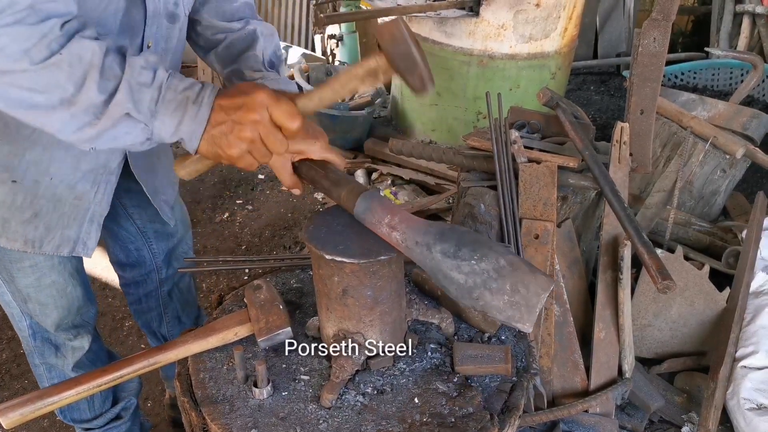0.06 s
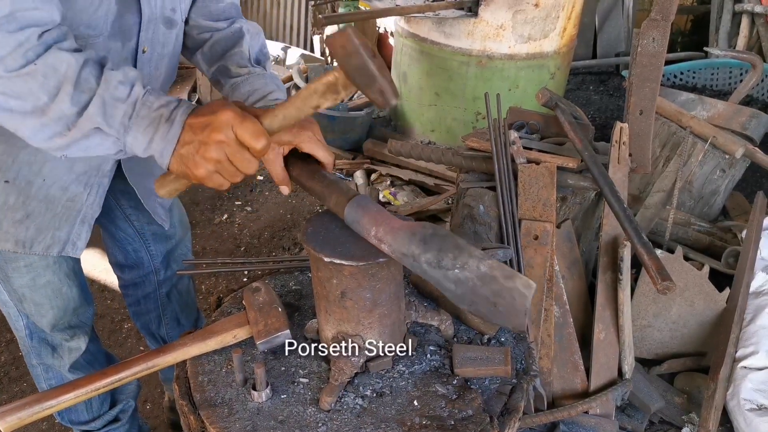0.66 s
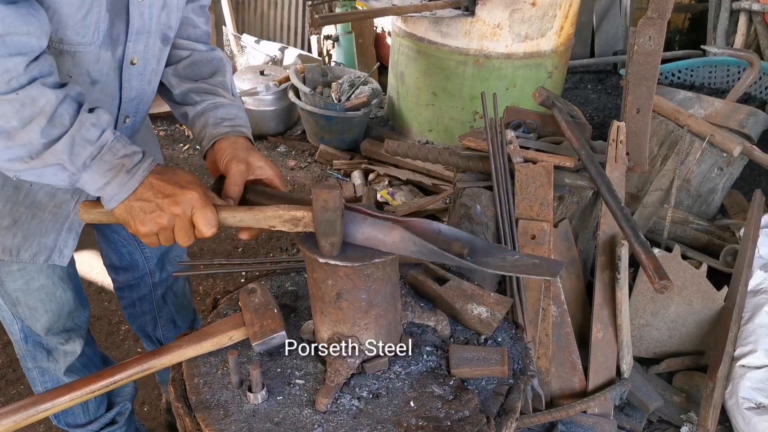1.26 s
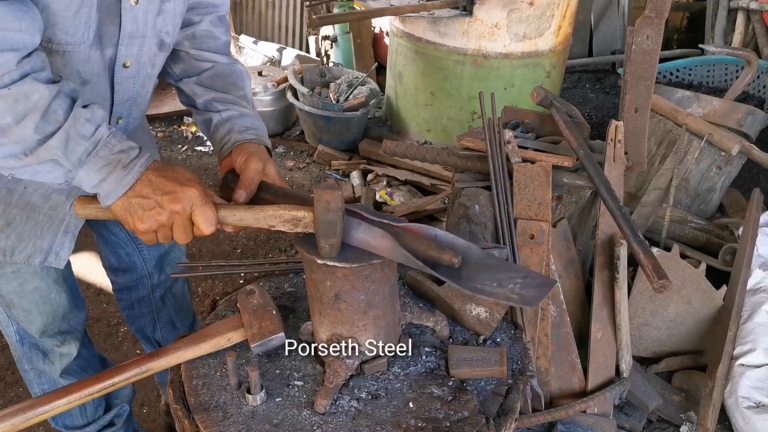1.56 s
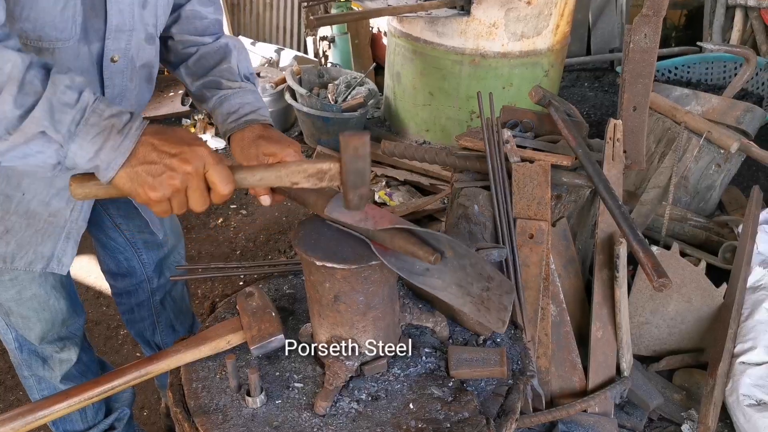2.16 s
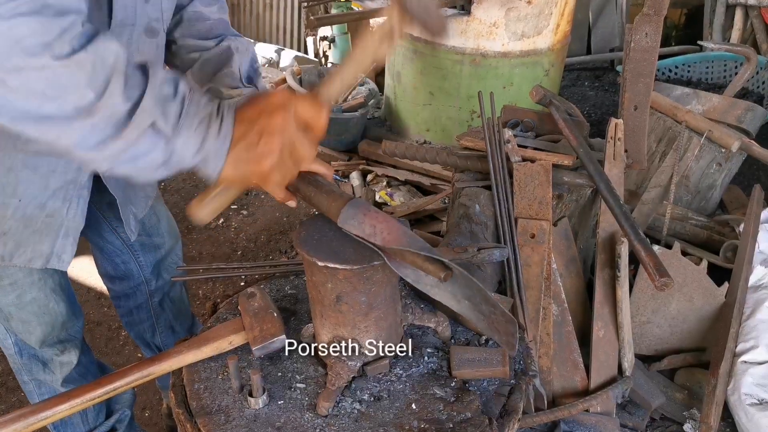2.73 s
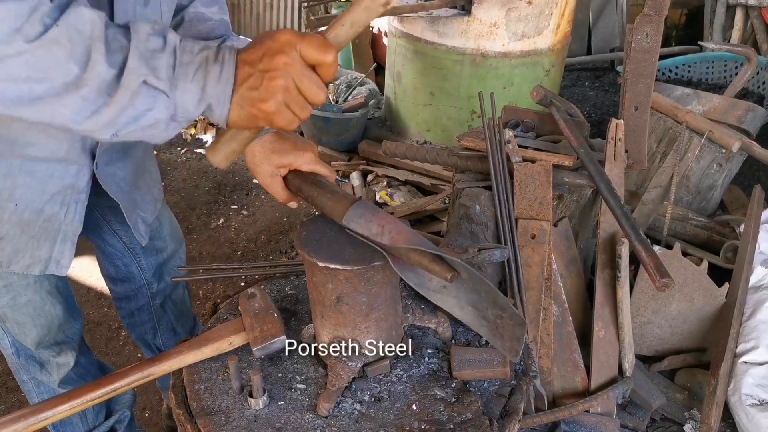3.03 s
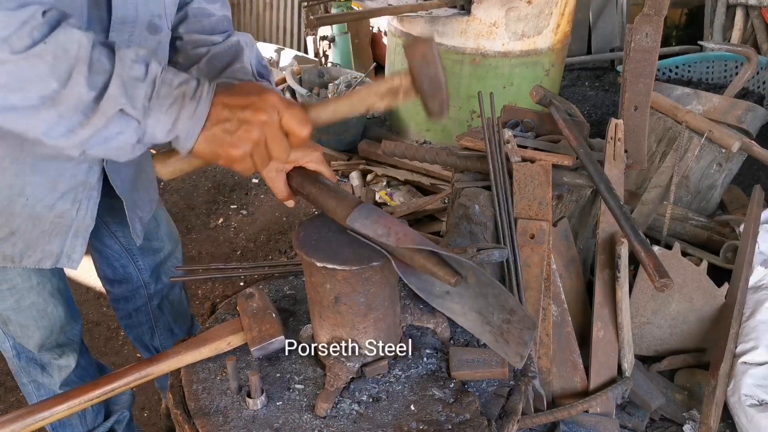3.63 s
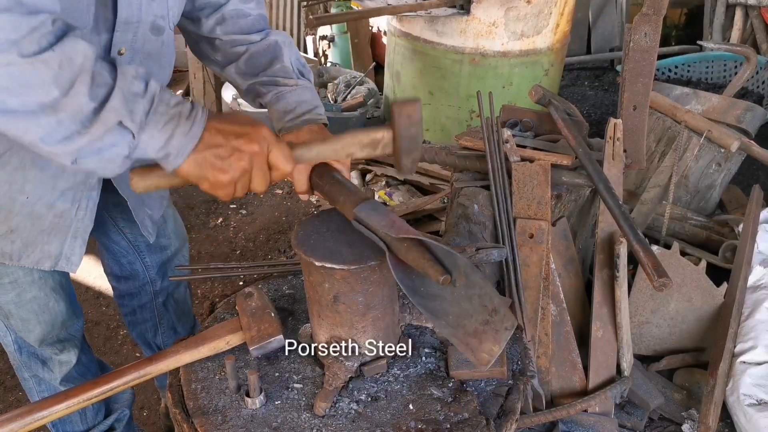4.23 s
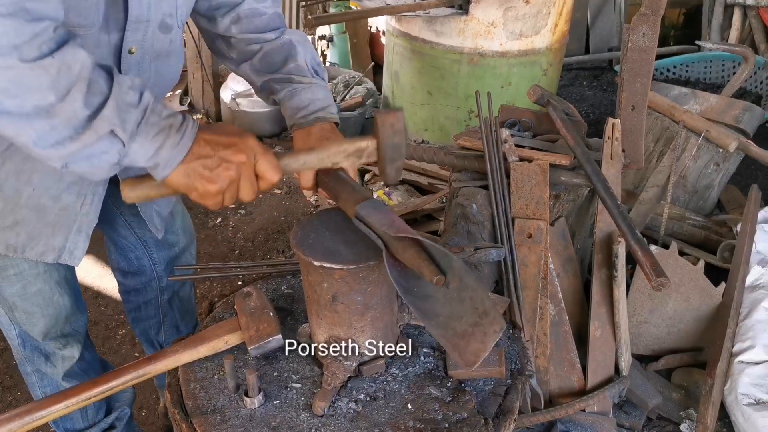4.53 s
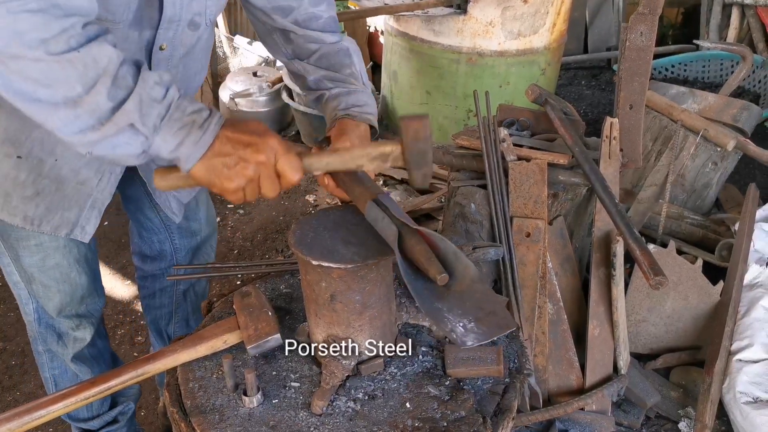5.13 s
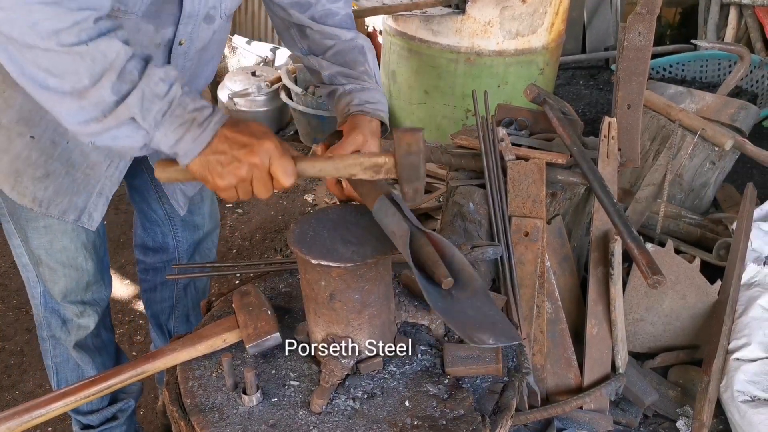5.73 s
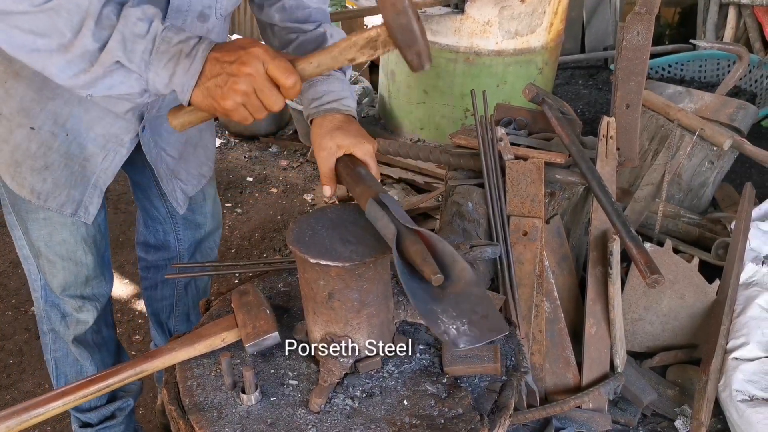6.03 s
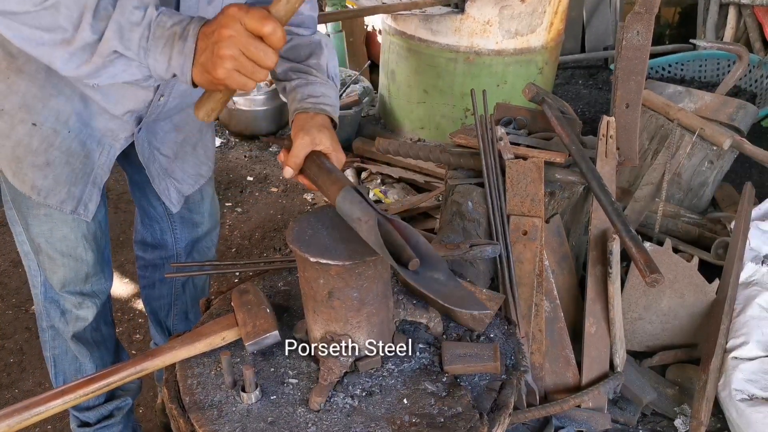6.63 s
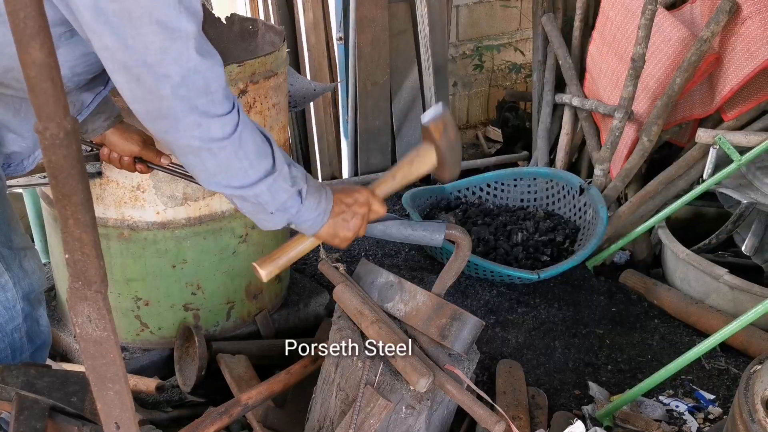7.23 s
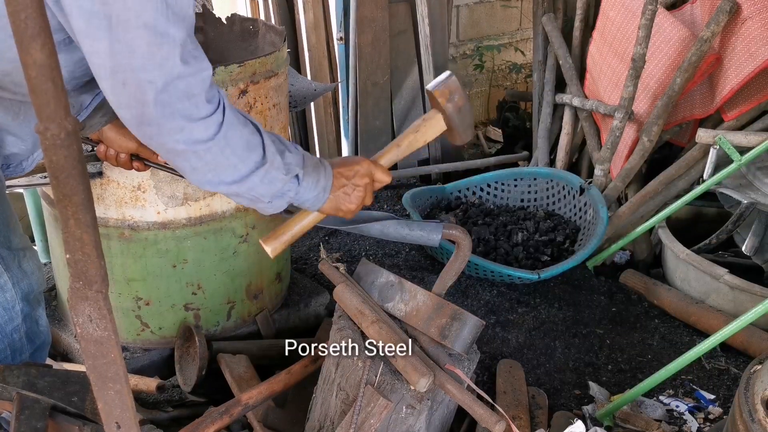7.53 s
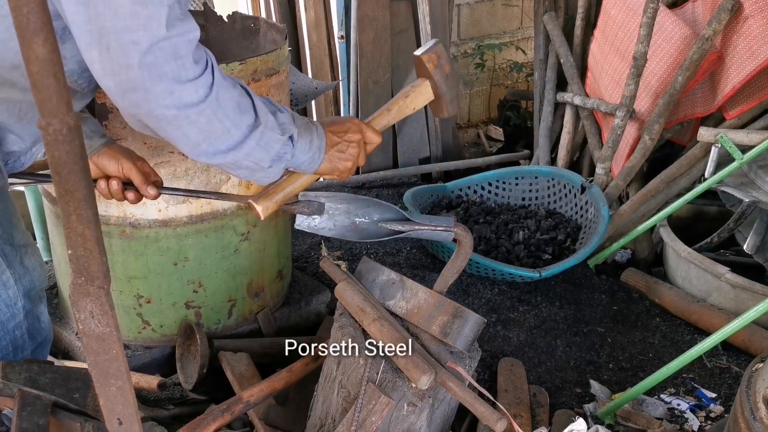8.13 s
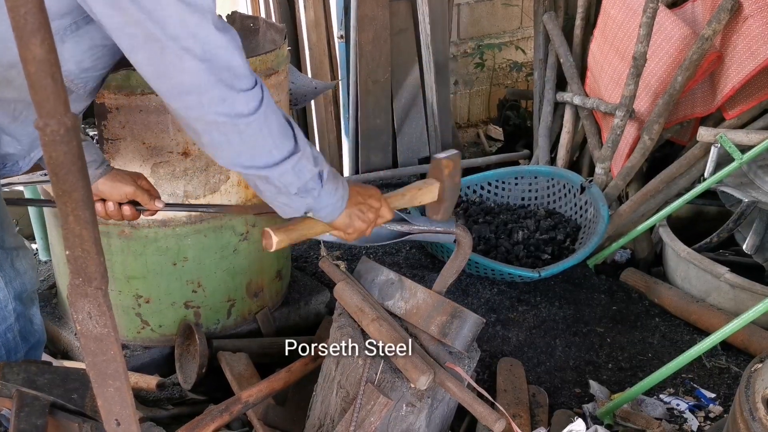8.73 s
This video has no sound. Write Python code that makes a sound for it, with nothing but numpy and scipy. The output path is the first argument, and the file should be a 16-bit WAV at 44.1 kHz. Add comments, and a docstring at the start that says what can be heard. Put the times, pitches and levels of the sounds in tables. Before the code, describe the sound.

Hammer blows clang on a steel blade in a workshop, in runs broken by brief pauses, small knocks and sliding metal.

```python
"""Hammering a blade on an anvil

A smith strikes a hand-held steel blade in an open workshop, sliding and knocking it between runs.
Each blow is a crack, a short clang of the blade, a thin ring of the anvil and a thud of its block.
A limiter ducks the room's rumble and hiss. After a brief fade to silence the work goes on over
an iron stake, with an engine chugging far off."""
import sys
import numpy as np
from scipy import signal
from scipy.fft import rfft, irfft, next_fast_len
from scipy.io import wavfile
from scipy.ndimage import uniform_filter1d

SR = 44100
rng = np.random.default_rng(int(sys.argv[2]) if len(sys.argv) > 2 else 0)


def wav_record(signal):
    """Record a signal, one row per channel, as 16-bit PCM in the file named by sys.argv[1]."""
    frames = np.transpose(np.atleast_2d(signal))
    bounded = np.clip(frames, -1, 1)
    # unit amplitude maps onto the largest positive 16-bit level
    quanta = np.round(bounded * 32767).astype(np.int16)
    wavfile.write(sys.argv[1], SR, quanta)


N = 386757
TIME = np.arange(N) / SR
STAKE_FROM_S = 7.254  # anvil before, stake after


def gain_of(db):
    """Decibels to amplitude."""
    return 10 ** (np.asarray(db) / 20)


def unit_rms(x):
    """Scales to rms 1."""
    return x / np.sqrt(np.mean(x ** 2) + 1e-20)


def curve_at(points, hz):
    """Interpolates on a log-frequency axis."""
    point_hz, value = np.transpose(points)
    return np.interp(np.log(hz + 1), np.log(point_hz), value)


def add(mix, start_s, sound):
    """Mixes in a stereo sound."""
    part = mix[:, max(round(start_s * SR), 0):][:, :sound.shape[1]]
    part += sound[:, :part.shape[1]]


def wander(n, size):
    """Smooth random curve, rms 1, changing over about size steps."""
    return unit_rms(uniform_filter1d(uniform_filter1d(rng.standard_normal(n), size), size))


# left-right coherence: (frequency [Hz], coherence [0-1])
COHERENCE = [(50, 1), (400, 0.91), (1000, 0.14), (2500, 0.045), (6000, 0.028), (15000, 0.05)]


def noise(spectrum, n, colour_db=0, ripple_db=0):
    """Shaped stereo noise with random peaks and dips, rms 1 before colouring; near-mono bass."""
    hz = np.fft.rfftfreq(n, 1 / SR)
    left, other = rfft(rng.standard_normal((2, n)))
    coherence = curve_at(COHERENCE, hz)
    right = coherence * left + np.sqrt(1 - coherence ** 2) * other
    shape_db = curve_at(spectrum, hz) + ripple_db * np.minimum(wander(len(hz), size=36), 2)
    bins = np.array([left, right]) * gain_of(shape_db)
    return irfft(bins * gain_of(colour_db), n) / np.std(irfft(bins, n))


def ring(hz, db, t60_s, t):
    """Decaying sines; higher modes differ more in phase between the microphones."""
    phase, spread = rng.uniform(-np.pi, np.pi, (2, len(hz)))
    phasors = np.exp(1j * np.array([phase, phase + spread * np.minimum(hz / 5000, 1)]))
    waves = np.exp(np.outer(2j * np.pi * hz - np.log(1000) / t60_s, t))
    return np.einsum("cm,mt->ct", phasors * gain_of(db), waves).real


def pan(x, right_db):
    """Sets the right channel's level relative to the left."""
    return x * gain_of(np.array([[-.5], [.5]]) * right_db)


def from_left(x, lag_s=0.00034):
    """Low sound from outside reaches the right microphone later and weaker."""
    delayed = np.interp(TIME - lag_s, TIME, x[1])
    return pan(np.array([x[0], delayed]), right_db=-2)


# room noise spectra: (frequency [Hz], relative density [dB])
RUMBLE_SPECTRUM = [(20, -14.5), (50, 5.5), (100, 6.5), (140, 0.5), (200, -9.5), (300, -20.5), (600, -35.5),
                   (1500, -73.5)]
HISS_SPECTRUM = [(100, 12.5), (400, 1.5), (800, 1.5), (1400, -1.5), (2300, 4), (3200, -6.5), (5000, -12.5),
                 (9000, -17), (13000, -22.5), (16000, -23.5)]
# room levels: (time [s], rumble [dB], hiss [dB])
ROOM_LEVELS = [(0, -63.5, -59.5), (1.501, -53, -57.5), (6.7, -53, -60), (7.4, -53, -56.5), (8.77, -57, -58)]


def workshop():
    """Slightly lumpy low rumble under a soft hiss."""
    times_s, *levels_db = np.transpose(ROOM_LEVELS)
    rumble_db, hiss_db = (np.interp(TIME, times_s, db) for db in levels_db)
    lumps_db = 0.56 * wander(N, size=2500)
    n_fft = next_fast_len(N, True)
    rumble = noise(RUMBLE_SPECTRUM, n_fft)[:, :N] * gain_of(rumble_db + lumps_db)
    hiss = noise(HISS_SPECTRUM, n_fft)[:, :N] * gain_of(hiss_db)
    return from_left(rumble) + hiss


# exhaust resonances: (frequency [Hz], relative level [dB], t60 [s])
EXHAUST_MODES = [(123.3, 2.5, 0.093), (193, -8.5, 0.1), (269, -6.5, 0.084), (359.7, -15, 0.16)]


def engine(firing_hz=21.53, scatter_db=2.2, level_db=-51.5, attack_s=0.0088):
    """Each firing of a distant engine rings its exhaust; heard only beside the stake."""
    cycles = np.cumsum(firing_hz * (1 + .004 * wander(N, size=6000))) / SR
    firings = np.diff(np.floor(cycles), prepend=0) * gain_of(scatter_db * rng.standard_normal(N))
    t = np.arange(SR // 4) / SR
    puff = sum(gain_of(db - 60 * t / t60_s) * np.sin(2 * np.pi * hz * t)
               for hz, db, t60_s in EXHAUST_MODES)
    puff *= 1 - np.exp(-t / attack_s)
    chug = unit_rms(signal.oaconvolve(firings, puff)[:N]) * gain_of(level_db) * (TIME > STAKE_FROM_S)
    return from_left([chug, chug])


# steel friction: (frequency [Hz], relative density [dB])
RUB_SPECTRUM = [(200, -30), (1000, -20), (2500, -14.5), (4500, -6.5), (8000, -7.5), (11000, -1),
                (14000, -3), (16000, 2)]
# strokes: (peak time [s], 20 dB rise [s], 20 dB fall [s], relative level [dB])
SLIDE_STROKES = [ (1.345, 0.043, .1, -51.5), (1.439, .05, .15, -54.5), (1.68, 0.13, 0.063, -47.5),
                 (2.079, 0.022, 0.19, -47), (2.316, 0.11, 0.072, -39), (2.394, 0.075, 0.067, -41),
                 (6.001, 0.074, 0.16, -54), (7.87, 0.13, 0.1, -32.5), ]


def sliding(trim_db=-7, grain=0.27, resonance_db=12, half_width_hz=29):
    """The blade rubs over its support: gritty swells of hiss that sing faintly at its modes."""
    out = np.zeros((2, N))
    t = np.arange(SR) / SR - .5
    offset_hz = np.fft.rfftfreq(SR, 1 / SR)[:, None] - np.transpose(BLADE_MODES)[0]
    colour_db = resonance_db * (1 / (1 + (offset_hz / half_width_hz) ** 2)).max(1)
    for peak_s, rise_s, fall_s, db in SLIDE_STROKES:
        grit = unit_rms(np.exp(grain * wander(SR, size=90)))
        rub = unit_rms(noise(RUB_SPECTRUM, SR, colour_db, ripple_db=4.2)) * grit
        envelope_db = -20 * np.maximum(-t / rise_s, t / fall_s)
        add(out, peak_s + t[0], rub * gain_of(trim_db + db + envelope_db))
    return out


# wooden block: (frequency [Hz], level [dB], t60 [s])
BLOCK_MODES = [(125, -27.5, 0.033), (193, -21.5, 0.025), (392, -17.5, 0.011)]


def block_thud(t):
    """The wood under the iron thuds: low, heavily damped modes."""
    return ring(*np.transpose(BLOCK_MODES), t)


# iron supports: (frequency [Hz], level [dB], free t60 [s])
ANVIL_MODES = [(3271, -12, .32)]
STAKE_MODES = [(6099, -32, .55), (8240, -31, .4), (10290, -38, .34)]


def support_ring(t, start_s, level_db, damping_per_s=3.1):
    """Anvil or stake rings; a blade pressed flat on it both weakens and shortens the ring."""
    modes = ANVIL_MODES if start_s < STAKE_FROM_S else STAKE_MODES
    damping_db = damping_per_s * min(level_db, 0) * t
    return ring(*np.transpose(modes), t) * gain_of(level_db + damping_db)


def tone_db(hz, bass_db, treble_db):
    """Shelves: a soft seat adds bass, a hard square contact adds treble."""
    return bass_db / (1 + (hz / 1300) ** 3) + treble_db / (1 + (5000 / (hz + 1)) ** 3)


# clang spectrum: (frequency [Hz], relative density [dB])
CLANG_SPECTRUM = [(60, -23.5), (250, -17.5), (550, -14), (850, -4.5), (1450, -10.5), (2100, 1), (3000, -4),
                  (4300, -2.5), (8000, -7), (11000, -8), (13500, -11), (16000, -22)]
# clang decay: (frequency [Hz], t60 [s])
CLANG_DECAY = [(150, 0.22), (800, 0.17), (2300, 0.2), (5000, 0.17), (14000, 0.16)]


def clang(t, bass_db, treble_db, trim_db=-5):
    """Dense weak steel modes and workshop reflections, as noise decaying band by band."""
    colour_db = tone_db(np.fft.rfftfreq(len(t), 1 / SR), bass_db, treble_db)
    wash = noise(CLANG_SPECTRUM, len(t), colour_db, ripple_db=4.2)
    hz, age_s, bands = signal.stft(wash, SR, nperseg=256)
    decay_db = -60 * age_s / curve_at(CLANG_DECAY, hz)[:, None]
    return signal.istft(bands * gain_of(trim_db + decay_db), SR)[1][:, :len(t)]


# blade modes: (frequency [Hz], relative level [dB], t60 [s], antinode position [0-1])
BLADE_MODES = [ (765, 0, .12, .76), (803, -2, .17, .8), (975, -1, .15, .49), (1228, -1, .17, .55),
               (1310, -5, .17, .97), (1703, 2, .17, .05), (1862, 2, .18, .52), (2300, 1, .19, .86),
               (2560, 7, .08, .28), (2750, 9, .12, .28), (2965, 1, .21, .42), (3240, 3, .18, .1),
               (3692, 2, .19, .62), (3920, 4, .18, .2), (4150, 8, .05, .28), (4252, 0, .2, .82),
               (4572, 0, .19, .79), (4810, 3, .18, .53), (5420, 7, .08, .08), (5550, 2, .16, .57),
               (5860, 1, .17, .7), (6095, 0, .18, .65), (6700, -1, .22, .62), (6876, 5, .16, .1),
               (7745, -2, .18, .85), (8890, 2, .16, .12), (9505, 1, .18, .8), (10600, 5, .14, .52),
               (11004, 2, .16, .68), (12400, 1, .15, .6), ]


def blade_ring(t, position, bass_db, treble_db, trim_db=-16, scatter_db=2, reach=.2):
    """A mode answers most when struck near its antinode; grip and seat detune it slightly."""
    hz, db, t60_s, antinode = np.transpose(BLADE_MODES)
    scatter, detune = rng.standard_normal((2, len(hz)))
    miss_db = 12 * (1 - np.exp(-((position - antinode) / reach) ** 2))
    mode_db = db + trim_db - miss_db + tone_db(hz, bass_db, treble_db) + scatter_db * scatter
    return ring(hz * (1 + .002 * detune), mode_db, t60_s, t)


# steel contact: (frequency [Hz], relative density [dB])
CRACK_SPECTRUM = [(40, -14), (150, -9), (500, -8.5), (900, 3), (1400, -5.5), (2100, 11), (3200, 0.5),
                  (5500, 3), (8000, -6.5), (11000, 3), (16000, -8)]


def crack(t, bass_db, treble_db, trim_db=3, t60_s=.034):
    """Steel meets steel: a short burst of noise."""
    colour_db = tone_db(np.fft.rfftfreq(len(t), 1 / SR), bass_db, treble_db)
    return noise(CRACK_SPECTRUM, len(t), colour_db) * gain_of(trim_db - 60 * t / t60_s)


def impact(start_s, position, bass_db, treble_db, support_db, thud_db, crack_db=0, ring_db=0):
    """One contact cracks and excites the blade, its support and the block below."""
    t = np.arange(SR // 2) / SR
    sound = crack(t, bass_db, treble_db) * gain_of(crack_db)
    sound += clang(t, bass_db, treble_db)
    sound += blade_ring(t, position, bass_db, treble_db) * gain_of(ring_db)
    sound += support_ring(t, start_s, support_db)
    sound += block_thud(t) * gain_of(thud_db)
    attack = 1 - np.exp(-t / 0.00038)
    return sound * attack


# knocks: (time [s], force [dB], position on blade [0-1], bass [dB], treble [dB], support ring [dB])
LIGHT_KNOCKS = [ (1.1483, -15, 0.12, -1.5, -20.5, -20), (1.2239, -28.5, 0.27, -4, -6.5, -23),
                (1.234, -26, 0.28, 1, -12.5, -20), (1.874, -52.5, 0.43, 4, 13, -25),
                (1.902, -46, 0.71, 15, 4, -23), (3.326, -26.5, 0.42, 2.5, -5, -13),
                (5.826, -19.5, 0.27, -6, -9, -9), (6.221, -45, 0.04, -4, -8.5, -21),
                (6.627, -31, 0.87, 7.5, -7.5, -22), (6.6372, -29, 0.6, 8, 0, -7),
                (6.662, -25, 0.7, -8.5, -10.5, 0), (8.116, -50, 1., 21, -13, -24),
                (8.251, -43, 0.85, 21.5, -21, -10), ]


def knocking(firm_force_db=-9, firm_crack_db=11):
    """Blade or hammer is set down; a lighter knock is a longer, softer contact and cracks less."""
    out = np.zeros((2, N))
    for start_s, force_db, position, bass_db, treble_db, support_db in LIGHT_KNOCKS:
        crack_db = firm_crack_db - 2 * (firm_force_db - force_db)
        knock = impact(start_s, position, bass_db, treble_db, support_db, thud_db=-4, crack_db=crack_db)
        add(out, start_s, knock * gain_of(force_db))
    return out


# blows: (time [s], force [dB], position on blade [0-1], blade ring [dB], bass [dB],
# block thud [dB], support ring [dB])
HAMMER_BLOWS = [ (0.000, -15.5, 0.11, -5, -0.5, -8, -25.5), (0.2728, -6.5, 0, 0.5, 3, -3.5, -32),
                (0.561, -1, .06, 4, -8, 7, -12), (0.8526, -6.5, .14, 0, -1, -9.5, -32.5),
                (2.855, -4, 0, -7.5, -2, -9.5, -30), (3.2255, -3, 0.23, -6, -0.5, -2, -9),
                (3.584, 0.5, 0.39, 0.5, -5.5, -1.5, -16), (3.9154, 0.5, 0.47, 0, 0, -22, -9.5),
                (4.2306, 2.5, .57, -0.5, -4.5, 13.5, -6), (4.5279, 4, 0.66, -1.5, -3, 17, -5.5),
                (4.8212, 1.5, 0.65, 0, -5, 0.5, -1.5), (5.1333, -4.5, 0.8, -5, -1, -22.5, -7),
                (5.441, -5, 0.9, 3, 2.5, -28, -8.5), (5.7450, -1.5, 0.65, -2.5, -3.5, -2, -14),
                (6.2918, -0.5, 0.84, -5, -1.5, -15.5, -12.5), (6.8539, 0.5, 0.85, -5.5, -2, -12, -26),
                (7.3504, 7, 1., -6.5, 6, -4.5, -10.5), (7.7369, 0, 1., 1, 0.5, 8.5, -1), ]


def hammering(anvil_treble_db=4.5, stake_treble_db=1.5, slap_delay_s=.0048, slap_re_thud_db=-18):
    """Each blow strikes the blade, then slaps it onto the iron; more thud, more slap."""
    out = np.zeros((2, N))
    slap_t = np.arange(SR // 8) / SR
    for start_s, force_db, position, ring_db, bass_db, thud_db, support_db in HAMMER_BLOWS:
        treble_db = anvil_treble_db if start_s < STAKE_FROM_S else stake_treble_db
        strike = impact(start_s, position, bass_db, treble_db, support_db, thud_db, ring_db=ring_db)
        slap = crack(slap_t, bass_db, treble_db) * gain_of(thud_db + slap_re_thud_db)
        add(out, start_s, strike * gain_of(force_db))
        add(out, start_s + slap_delay_s, slap * gain_of(force_db))
    return out


def scene():
    """Blows and knocks to the right, over engine, sliding steel and room noise."""
    impacts = pan(hammering() + knocking(), right_db=3)
    return impacts + engine() + sliding() + workshop()


def limiter(x, threshold_db=-29, attack_s=0.00044, fast_db_per_s=128, slow_db_per_s=28):
    """Gain drops on a blow and climbs back, the last few dB slowly: rings stretch, the room swells."""
    power_db = 10 * np.log10(abs(uniform_filter1d((x ** 2).mean(0), size=180)) + 1e-12)
    reduction_db = np.zeros(N)
    for share, detector_fall_db in (0.8, TIME * fast_db_per_s), (0.084, TIME * slow_db_per_s):
        held_db = np.maximum.accumulate(power_db + detector_fall_db) - detector_fall_db
        reduction_db = np.maximum(reduction_db, share * (held_db - threshold_db))
    pole = np.exp(-1 / (attack_s * SR))
    return x / gain_of(signal.lfilter([1 - pole], [1, -pole], reduction_db))


def record(dry, makeup_db=5.5, fade_from_s=6.975, fade_db_per_s=141, mute_from_s=7.195, cutoff_hz=15350):
    """Limiter, clipping, fade to silence between anvil and stake, low-pass."""
    limited = np.clip(limiter(dry) * gain_of(makeup_db), -1, 1)
    fade_out = gain_of(-fade_db_per_s * np.maximum(TIME - fade_from_s, 0)) * (TIME < mute_from_s)
    fader = uniform_filter1d(fade_out + (TIME > STAKE_FROM_S), size=200)
    lowpass = signal.firwin(255, cutoff_hz, window=("kaiser", 9), fs=SR)
    return signal.oaconvolve(limited * fader, lowpass[None], "same")


dry = scene()
out = record(dry)
wav_record(out)
```